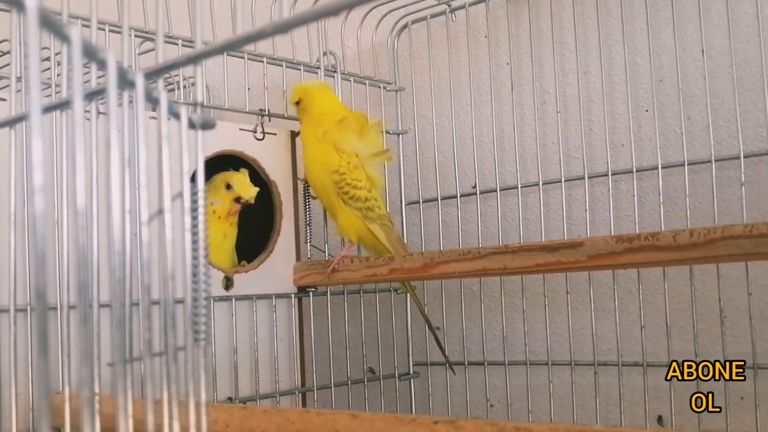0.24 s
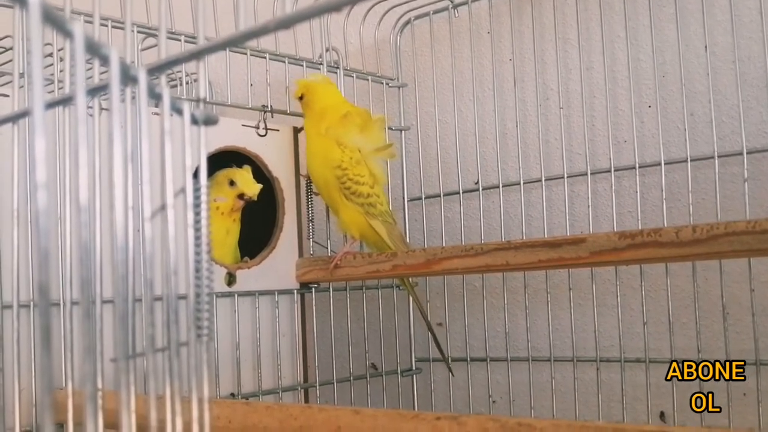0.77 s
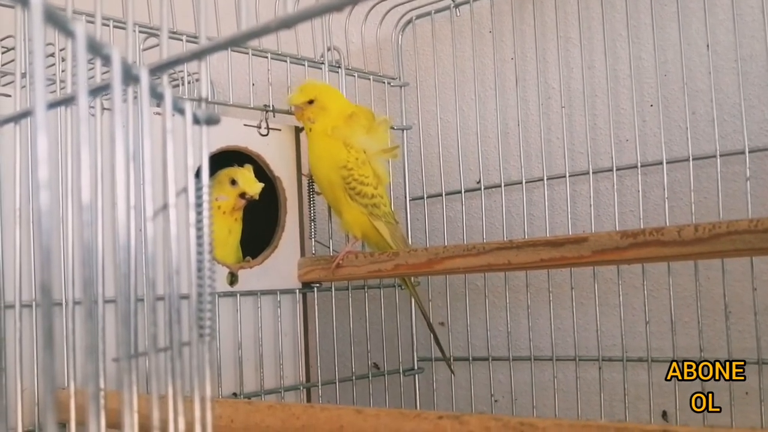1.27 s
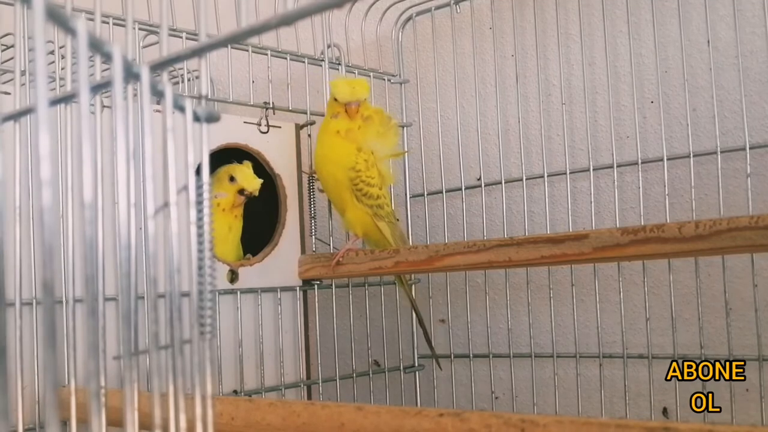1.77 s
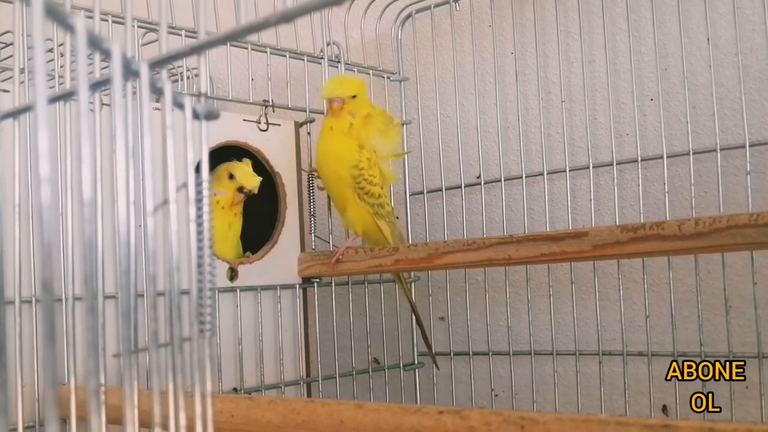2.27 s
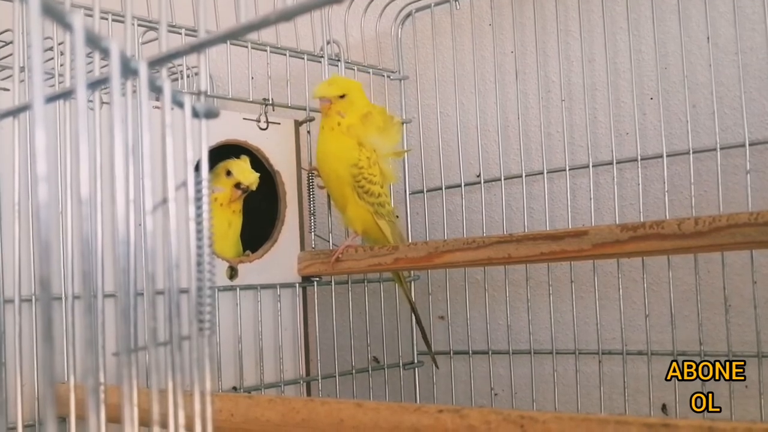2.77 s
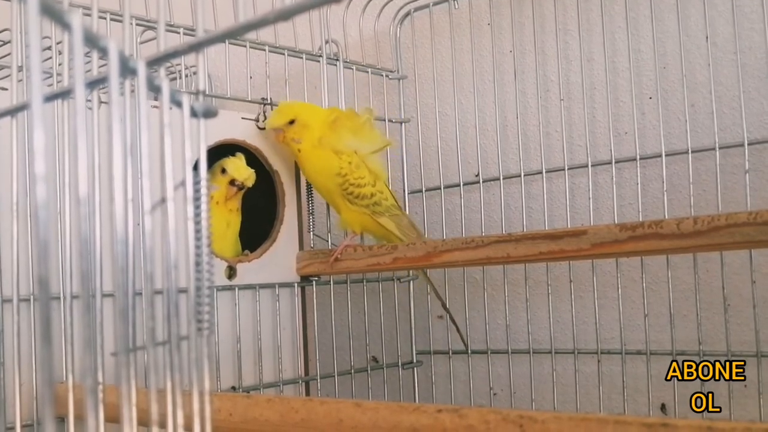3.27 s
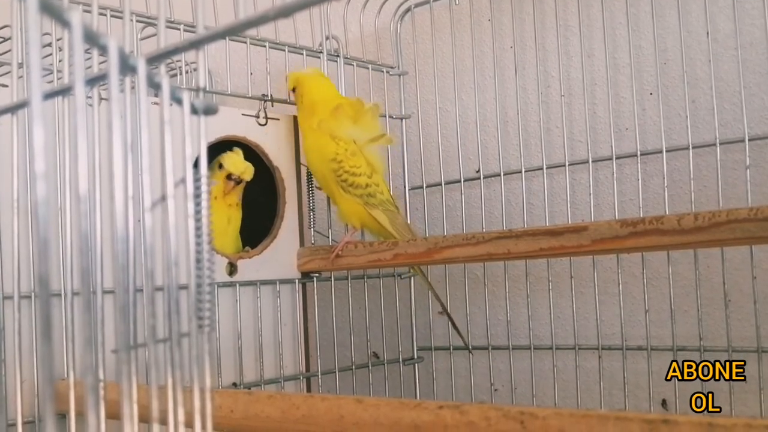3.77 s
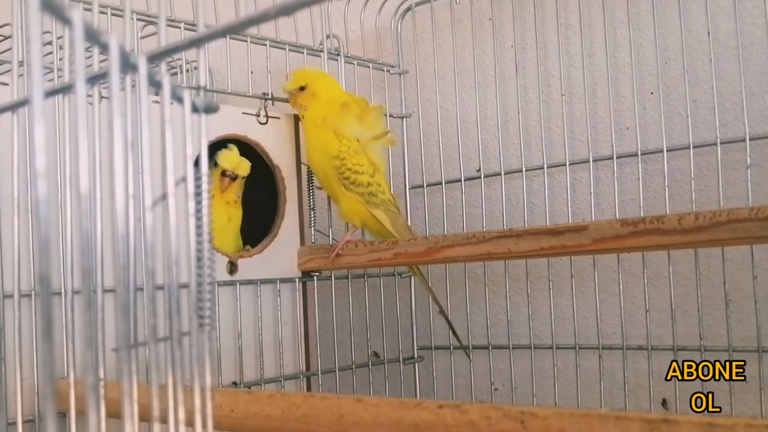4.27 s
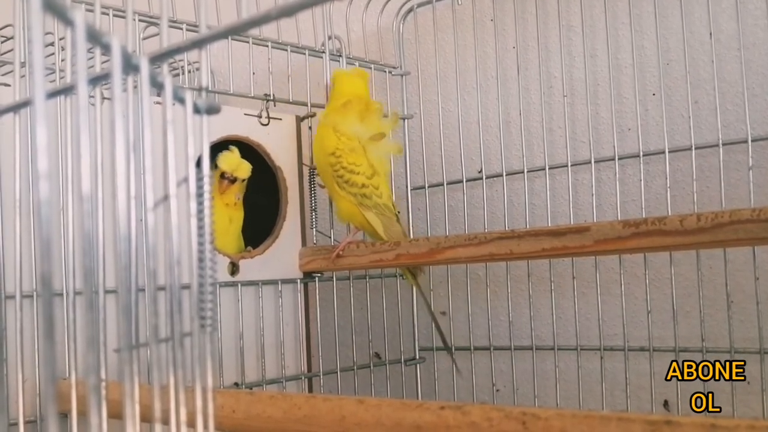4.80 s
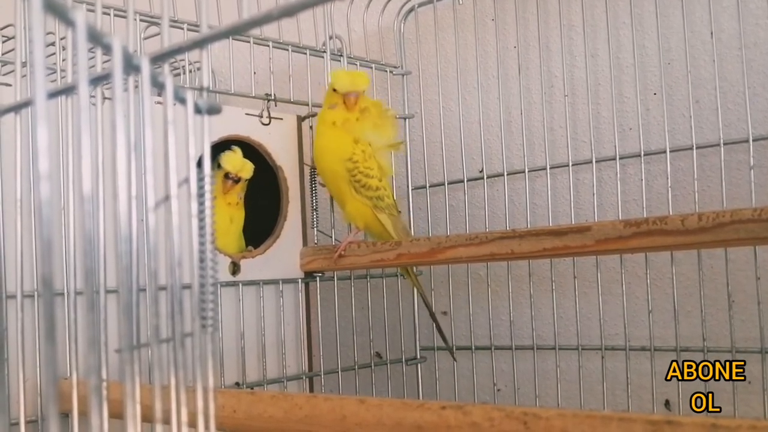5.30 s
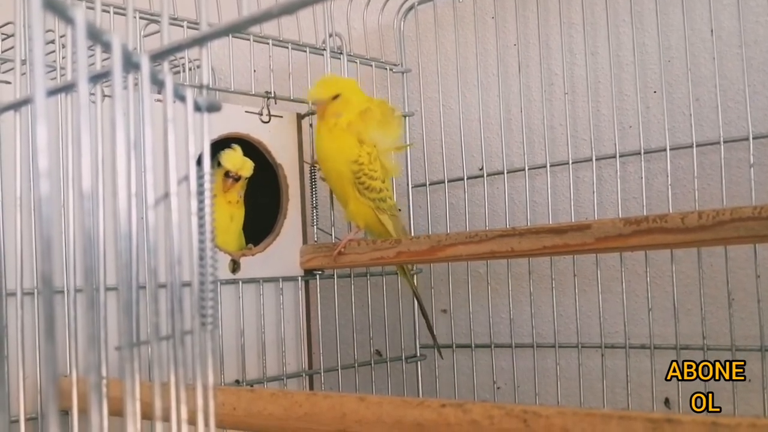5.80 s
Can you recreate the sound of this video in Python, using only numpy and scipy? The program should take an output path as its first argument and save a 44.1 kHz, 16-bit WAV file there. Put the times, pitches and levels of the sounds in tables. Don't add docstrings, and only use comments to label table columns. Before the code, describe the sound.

A dense volley of parakeet chirps opens at once, bright whistles and buzzy warbles around 3 kHz with higher rasps, ringing in a bare room. By 0.6 s it thins, leaving a low, rapid motor thump of about eighteen turns a second and a bassy air hush; soft doves begin cooing at about 0.4 s. Scattered chirps and rasps come at 1.2-1.5 s. From 1.8 to 3.5 s the chatter is thick, with purring syllables and harsh screeches near 5-6 kHz; doves coo again from 2.6 s. A calmer stretch lasts until about 4.25 s, then a crisp run of close, clear chirps bursts out until 5 s. Rasps and screeches continue to about 5.6 s, as a third cooing bout and faint feather flutter join. A few last burrs sound near 5.8-6 s. The background sinks under loud calls and creeps back.

```python
import sys
import numpy as np
from scipy import signal
from scipy.fft import rfft, irfft
from scipy.io import wavfile
from scipy.ndimage import uniform_filter1d

SR = 44100
rng = np.random.default_rng(int(sys.argv[2]) if len(sys.argv) > 2 else 0)


def transcribe(signal):
    frames = np.atleast_2d(signal).T
    limited = np.clip(frames, -1, 1)
    pcm = np.round(limited * 32767).astype(np.int16)
    wavfile.write(sys.argv[1], SR, pcm)


def makeup_ratio(level_db):
    decades = np.asarray(level_db, float) / 20
    return 10 ** decades


N = 266805
RISE, FALL = 1.13, .87


def on_log(hz, table):
    point_hz, values = np.array(table).T
    return np.interp(np.log(hz + 1), np.log(point_hz), values)


def walk(rate, size=N):
    k = max(int(SR / rate), 2)
    steps = np.repeat(rng.standard_normal(size // k + 2), k)
    wander = uniform_filter1d(uniform_filter1d(steps, k), k)[:size]
    return wander / np.std(wander)


def pair(size):
    # pitch_hz, likeness (0 to 1)
    likeness = [(60, 0.92), (290, 0.91), (630, 0.76), (1200, 0.02)]
    like = np.clip(on_log(np.fft.rfftfreq(size, 1 / SR), likeness), 0, 1)
    mid, side = rfft(rng.standard_normal((2, size)))
    shared = mid * np.sqrt(1 + like)
    differing = np.outer([1, -1], side * np.sqrt(1 - like))
    return (shared + differing) / np.sqrt(2)


def room(x, direct_db, build_s):
    # pitch_hz, time to fall by 60 dB (s)
    ring_times = [(400, 0.47), (1500, 1.65), (3500, 1.18), (6000, 1.08), (10000, 0.55)]
    size = 2 ** 16
    hz, t = np.fft.rfftfreq(size, 1 / SR), np.arange(size) / SR
    noise, tail = pair(size), 0
    early, early_fall = .38, np.log(1000) / .15
    for centre in 125 * 2. ** np.arange(8):
        octaves_off = np.log2((hz + 1) / centre)
        band = np.cos(np.pi / 2 * np.clip(octaves_off, -1, 1)) ** 2
        fall = np.log(1000) / on_log(centre, ring_times)
        late_power = (1 - early) * fall * np.exp(-2 * fall * t)
        early_power = early * early_fall * np.exp(-2 * early_fall * t)
        tail = tail + irfft(noise * band) * np.sqrt(2 * (late_power + early_power) / SR)
    tail = tail * (1 - np.exp(-t / build_s))
    tail[[0, 1], [0, 17]] += makeup_ratio(direct_db)
    return signal.fftconvolve(x[None], tail, axes=1)[:, :N]


def notes(table, depth_hz, buzz_hz, jitter, regular, throb, octave_db, edge):
    out = np.zeros(N + SR)
    speed_hz = buzz_hz * (1 + .15 * walk(6) + jitter * walk(60))
    cycle = 2 * np.pi * np.cumsum(speed_hz) / SR
    regular = np.clip(regular, 0, 1)
    swing = np.sqrt(2 * regular) * np.sin(cycle) + np.sqrt(1 - regular) * walk(3.1 * buzz_hz)
    chop = np.exp(throb * np.cos(cycle) + throb * (1 - regular) * walk(2.2 * buzz_hz))
    chop = chop * np.exp(0.3 * throb * walk(buzz_hz / 7))
    for start_s, length_s, first_hz, last_hz, level_db in table:
        start = int(start_s * SR)
        u = np.linspace(0, 1, int(max(length_s, 1 / 200) * SR))
        at = np.minimum(start + np.arange(len(u)), N - 1)
        hz = first_hz + (last_hz - first_hz) * u + depth_hz * swing[at]
        phase = 2 * np.pi * np.cumsum(hz) / SR
        tone = np.sin(phase) + makeup_ratio(octave_db) * np.sin(2 * phase)
        if first_hz < SR / 10:
            tone = tone + makeup_ratio(octave_db - 7.0) * np.sin(3 * phase)
        shape = np.sin(np.pi * u) ** edge * chop[at]
        loudness = makeup_ratio(level_db) / np.sqrt(np.mean(shape ** 2))
        out[start:start + len(u)] += loudness * shape * tone
    return out[:N]


def bent(rows, bend, length_s=None):
    return [(r[0], length_s or r[1], r[-2], r[-2] * bend, r[-1]) for r in rows]


def phrases(held, up, down):
    return bent(held, 1) + bent(up, RISE) + bent(down, FALL)


def whistles():
    # start_s, pitch_hz, level_db
    chirp_rows = [(0.0, 3452, -11), (.027, 3143, -14), (.062, 3503, -21), (.501, 3265, -23.5),
                  (1.424, 4870, -33.5), (1.883, 3714, -18.5), (1.903, 2884, -19.5), (2.283, 3460, -38),
                  (2.302, 2960, -35), (2.632, 5960, -20.5), (2.836, 3170, -21.5), (2.886, 3027, -20),
                  (3.855, 2886, -21.5), (4.402, 3392, -15), (4.427, 3115, -16), (4.487, 3430, -22.5),
                  (4.492, 3053, -22), (4.617, 3190, -16.5), (5.944, 5850, -30)]
    # start_s, first_hz, level_db
    flick_rows = [(.042, 3910, -24), (1.295, 3010, -31), (1.866, 2987, -20.5), (2.552, 6180, -29),
                  (3.225, 3870, -24.5), (3.25, 5550, -23), (3.43, 5420, -26), (4.378, 3900, -26),
                  (4.986, 2730, -23)]
    # start_s, length_s, pitch_hz, level_db
    held_rows = [(.077, 0.068, 5630, -34), (.232, 0.11, 1960, -36), (1.96, 0.029, 3320, -22),
                 (3.7, 0.22, 2907, -34), (2.457, 0.1, 5280, -34), (2.811, 0.099, 3690, -27.5),
                 (4.343, 0.035, 3480, -33), (4.358, 0.047, 2870, -23), (5.914, 0.012, 3770, -21)]
    # start_s, length_s, first_hz, level_db
    falling_rows = [
        (.252, 0.11, 4300, -32),
        (0.372, 0.092, 2830, -32),
        (.402, 0.0438, 4080, -23),
        (3.572, 0.17, 3215, -31),
    ]
    rows = bent(chirp_rows, 0.98, length_s=0.017) + bent(flick_rows, RISE, length_s=0.0226)
    rows = rows + phrases(held_rows, [], falling_rows)
    return notes(rows, depth_hz=43.8, buzz_hz=260., jitter=0.101, regular=0.22, throb=0.32,
                 octave_db=-30.0, edge=0.56)


def burrs():
    # start_s, length_s, pitch_hz, level_db
    held_rows = [(0.0, 0.0063, 5650, -25), (.07, 0.11, 5420, -26), (2.806, 0.032, 6940, -28.5),
                 (2.961, 0.11, 2283, -33), (3.031, 0.032, 7440, -38), (3.15, 0.017, 7550, -38),
                 (3.33, 0.032, 6300, -31.5), (4.368, 0.24, 9470, -51.5), (5.226, 0.14, 5910, -33),
                 (5.32, 0.028, 7200, -35), (5.485, 0.09, 5740, -37.5), (5.815, 0.031, 9160, -34),
                 (5.814, 0.032, 6210, -23)]
    # start_s, length_s, first_hz, level_db
    rising_rows = [(2.396, 0.016, 2910, -20), (2.741, 0.015, 3030, -24), (3.15, 0.028, 3340, -27),
                   (3.26, .14, 3560, -27.5), (3.37, .14, 2950, -35.5), (4.742, 0.13, 3115, -28),
                   (5.166, 0.17, 3024, -32.5)]
    # start_s, length_s, first_hz, level_db
    falling_rows = [(.022, 0.13, 2942, -28), (.427, 0.16, 4000, -28.5), (1.478, 0.25, 2913, -36),
                    (2.267, 0.085, 3600, -25), (2.412, 0.13, 2926, -26.5), (2.567, .13, 3350, -29),
                    (4.512, 0.1, 3407, -26), (4.926, 0.14, 3203, -31), (5.795, 0.082, 3080, -28.5),
                    (6.004, 0.044, 3235, -25)]
    return notes(phrases(held_rows, rising_rows, falling_rows), depth_hz=454.0, buzz_hz=330., jitter=.08,
                 regular=0.82, throb=1.0, octave_db=-23.0, edge=0.49)


def rasps():
    # start_s, length_s, pitch_hz, level_db
    rasp_rows = [(0.0, 0.0077, 3642, -15.5), (.002, 0.27, 6250, -42.5), (.022, 0.15, 8930, -41),
                 (.227, 0.43, 3664, -36.5), (.367, 0.32, 5100, -42.5), (.481, 0.084, 8350, -45.5),
                 (.531, 0.0475, 4020, -26), (1.205, 0.0663, 3485, -28.5), (1.344, 0.05, 6860, -42.5),
                 (1.412, 0.0383, 4200, -24.5), (1.833, 0.091, 7380, -50), (2.068, 0.1183, 3058, -26.5),
                 (2.252, 0.077, 5860, -37.5), (2.776, 0.1136, 3572, -28), (3.14, 0.0397, 5360, -24),
                 (3.24, 0.017, 2530, -30.5), (3.904, 0.065, 3416, -28), (4.27, 0.12, 14200, -62),
                 (4.5, .2, 13800, -63), (4.78, 0.12, 14000, -61), (4.333, 0.068, 5970, -54),
                 (4.467, 0.16, 4570, -40.5), (4.712, 0.037, 5815, -46), (4.86, 0.101, 2985, -29.5),
                 (5.051, 0.1426, 3822, -29), (5.31, 0.1027, 3548, -30), (5.46, 0.0727, 3550, -29),
                 (5.47, 0.036, 7030, -31.5), (5.899, 0.14, 4115, -33)]
    # start_s, length_s, pitch_hz, level_db
    screech_rows = [(2.091, 0.053, 5870, -29), (2.453, 0.14, 5550, -28.5), (2.606, 0.046, 5690, -26.5),
                    (2.692, .14, 5540, -27), (2.853, 0.13, 6390, -33), (2.991, 0.12, 5430, -30.5),
                    (3.19, 0.13, 5600, -28), (3.386, 0.067, 6060, -26.5), (5.104, 0.16, 5850, -28),
                    (5.315, 0.16, 5820, -27.5)]
    upper = [(start_s, length_s, hz * 1.6, db - 10.5) for start_s, length_s, hz, db in screech_rows]
    return notes(bent(rasp_rows + screech_rows + upper, 0.93), depth_hz=961.0, buzz_hz=430., jitter=.03,
                 regular=0.93, throb=1.0, octave_db=-19.0, edge=0.43)


def warbles():
    # start_s, length_s, pitch_hz, level_db
    held_rows = [(.012, 0.17, 3300, -23), (.152, 0.012, 3306, -15), (.576, 0.1, 1703, -34.5),
                 (1.122, 0.07, 2860, -38), (1.14, 0.059, 1897, -39.5), (1.188, 0.05, 2493, -31.5),
                 (1.629, 0.094, 1817, -33.5), (1.838, 0.014, 3690, -25.5), (2.302, .14, 3188, -17.5),
                 (2.637, 0.16, 1980, -36.5), (2.726, 0.039, 5410, -25), (2.741, 0.047, 4880, -28),
                 (2.946, 0.068, 3666, -28), (4.258, 0.078, 3423, -22.5), (4.358, 0.15, 3327, -26.5),
                 (5.156, 0.047, 6300, -26), (5.35, .11, 5790, -29)]
    # start_s, length_s, first_hz, level_db
    rising_rows = [
        (.446, 0.16, 2031, -34),
        (1.379, 0.022, 2656, -26),
        (1.903, 0.026, 5570, -34.5),
        (3.859, 0.075, 2048, -34),
        (4.383, 0.19, 2205, -35),
        (5.133, 0.046, 5360, -25.5),
    ]
    # start_s, length_s, first_hz, level_db
    falling_rows = [(1.823, 0.15, 3230, -25), (1.853, 0.14, 2243, -36), (1.863, .16, 3670, -25.5),
                    (2.487, 0.026, 6410, -24), (2.796, 0.15, 3344, -31), (2.851, .14, 3687, -21),
                    (3.549, 0.21, 3910, -40.5), (3.68, 0.083, 2550, -31), (4.258, 0.025, 3160, -25.5),
                    (4.682, 0.16, 2095, -37.5), (5.071, .04, 4430, -30)]
    return notes(phrases(held_rows, rising_rows, falling_rows), depth_hz=178.0, buzz_hz=250., jitter=.1,
                 regular=0.735, throb=0.53, octave_db=-30, edge=0.15)


def clear_calls():
    # start_s, length_s, pitch_hz, level_db
    syllable_rows = [(.068, .012, 3466, -20), (0.096, 0.015, 3380, -17.5), (.14, .012, 3480, -23),
                     (.158, 0.029, 3500, -22), (0.236, 0.015, 3170, -23.5), (1.973, .01, 3430, -19.5),
                     (1.985, 0.022, 3405, -21), (2.014, 0.018, 3390, -22), (2.051, 0.013, 3414, -24),
                     (4.7, .01, 3170, -27), (2.349, 0.011, 3310, -21), (2.369, 0.018, 3200, -17.5),
                     (4.424, .014, 3400, -18), (4.473, 0.016, 3370, -20)]
    # start_s, length_s, pitch_hz, level_db
    fleck_rows = [(1.19, 0.037, 7660, -53), (1.3, 0.048, 6730, -46), (1.61, .09, 8100, -57.5),
                  (1.64, 0.069, 6660, -52), (1.65, 0.091, 7700, -59), (1.65, .05, 7900, -59),
                  (1.68, 0.082, 9680, -57.5), (1.72, .06, 6430, -55), (1.85, 0.045, 9500, -51),
                  (1.885, 0.066, 7410, -49), (2.88, 0.063, 1414, -39), (4.245, 0.047, 8900, -57),
                  (4.32, 0.029, 9660, -55), (4.36, .05, 5865, -49), (4.43, .04, 9500, -52),
                  (4.47, 0.034, 7200, -55), (4.53, 0.066, 6000, -54), (4.55, .05, 9200, -60),
                  (4.31, 0.041, 2110, -41.5), (4.808, 0.018, 1680, -35.5), (4.826, 0.022, 1440, -36.5),
                  (5.02, 0.048, 1232, -43.5), (4.886, 0.011, 3350, -26)]
    # start_s, length_s, first_hz, level_db
    pip_rows = [(1.44, .07, 1175, -39), (1.82, .03, 3660, -36), (1.95, .022, 3380, -16),
                (2.281, .016, 3430, -19), (2.412, .022, 3420, -19), (2.56, .03, 6680, -31),
                (3.245, .03, 1500, -42), (3.585, .03, 2980, -33), (3.655, .03, 2910, -32),
                (4.01, .08, 5730, -50), (4.272, .024, 3600, -17), (4.28, .025, 7200, -47),
                (4.3, .014, 3600, -17), (4.32, .014, 3350, -15), (4.37, .02, 3420, -21),
                (4.404, .018, 3400, -16), (4.498, .014, 3480, -15), (4.533, .016, 3500, -16),
                (4.784, .014, 3550, -21), (4.822, .02, 4250, -29), (4.851, .023, 3580, -17),
                (4.893, .018, 3550, -18.5), (4.99, .05, 2800, -30), (5.59, .02, 1840, -40)]
    # start_s, pitch_hz, level_db
    purr_rows = [(2.889, 3050, -21.5), (2.905, 3650, -17), (2.932, 3390, -23), (2.941, 3500, -18),
                 (2.951, 3260, -21), (2.959, 3400, -20), (2.974, 3540, -20), (2.419, 3100, -17.5),
                 (2.427, 3300, -18.5), (4.437, 3230, -17.5), (4.501, 3110, -21)]
    rows = bent(pip_rows, 1.012) + bent(fleck_rows + syllable_rows, 1) + bent(purr_rows, 1, length_s=.006)
    calls = notes(rows, depth_hz=35., buzz_hz=200., jitter=.1, regular=.5, throb=.12, octave_db=-40, edge=.4)
    return makeup_ratio(-10) * room(calls, direct_db=11.5, build_s=.006)


def parakeets():
    # pitch_hz, width_hz, lift_db
    resonances = [
        (3227, 11, 4.5),
        (3524, 430, 2),
    ]
    voices = whistles() + burrs() + rasps() + warbles()
    air = uniform_filter1d(uniform_filter1d(rng.standard_normal(N), size=3), size=4)
    breath = uniform_filter1d(np.abs(voices), size=40) * air
    voices = voices + makeup_ratio(-10.0) * breath
    hz = np.fft.rfftfreq(N, 1 / SR)
    lift_db = sum(db / (1 + (2 * (hz - f) / w) ** 2) for f, w, db in resonances)
    throat = 1 / (1 + (1500 / (hz + 1)) ** 14)
    voices = irfft(rfft(voices) * makeup_ratio(lift_db) * throat, N)
    return room(voices, direct_db=-7.5, build_s=.005) + clear_calls()


def motor():
    # multiple of the shaft speed, level_db
    multiples = [(1, -37), (2, -13), (3, 1), (4, -10.5), (5, -6.5), (6, -26), (7, -41), (8, -13.5),
                 (9, -20.5), (10, -17), (11, -21.5), (12, -18.5), (13, -19.5), (14, -14), (15, -14.5),
                 (16, -12.5), (17, -27), (18, -40)]
    turn_hz = 18.56 * (1 + 0.00192 * walk(1.475))
    turn = 2 * np.pi * np.cumsum(turn_hz) / SR
    hum = 0
    for k, db in multiples:
        waver_db = 1.5 * walk(2.88)
        side_shift = np.array([[0], [0.019 * k]])
        hum = hum + makeup_ratio(db + waver_db) * np.cos(k * turn - .6 * k ** 2 + side_shift)
    return hum / np.std(hum)


def hush():
    # pitch_hz, level_db (per Hz)
    colour = [(15, -44), (25, -7.5), (71, 0.5), (196, -10.5), (292, -12.5), (393, -10.5), (541, -12),
              (707, -16), (1450, -14), (2690, -11.5), (3080, -31), (3510, -20), (14900, -46)]
    noise = irfft(pair(N) * makeup_ratio(on_log(np.fft.rfftfreq(N, 1 / SR), colour)), N)
    return noise / np.std(noise)


def duck(loud, knee_db, hold_s, strength):
    keep = np.exp(-1 / (hold_s * SR))
    power = signal.lfilter([1 - keep], [1, -keep], np.mean(loud ** 2, axis=0))
    return (1 + power / makeup_ratio(2 * knee_db)) ** -strength


def doves():
    bout_starts = [
        0.39,
        2.59,
        4.8,
    ]
    # s after its start, length_s, first_hz, last_hz, level_db
    opening = [
        (0.0, 0.066, 450, 458, -59),
        (.19, .13, 495, 525, -54),
        (.26, .22, 618, 610, -53),
        (.27, .3, 525, 530, -54.5),
    ]
    # start_s, length_s, pitch_hz, level_db
    coo_rows = [(.82, 0.12, 622, -51.5), (1.1, 0.25, 554, -50), (1.13, 0.58, 616, -50.5),
                (1.24, 0.31, 550, -50.5), (1.56, 0.15, 524, -51.5), (3.08, 0.23, 602, -49.5),
                (3.15, 0.89, 533.7, -55), (3.38, 0.42, 650, -52.5), (3.45, 0.38, 603.3, -52),
                (3.6, 0.26, 655, -55), (3.9, 0.19, 550, -70), (5.25, 0.41, 549.3, -52.5),
                (5.36, 0.33, 600, -49.5), (5.62, 0.23, 630, -50.5), (5.66, 0.13, 515, -48),
                (5.88, 0.16, 602, -51), (5.88, 0.21, 517, -51.5)]
    # start_s, length_s, first_hz, last_hz, level_db
    coo_ends = [(.57, 0.11, 490, 498, -52), (.95, 0.19, 519.5, 547, -47), (1.57, 0.17, 536, 533.3, -44.5),
                (2.73, .1, 488, 515, -60), (3.8, 0.3, 543.4, 550.5, -50.5), (3.86, 0.12, 464, 450, -60),
                (4.96, 0.11, 494, 505, -53)]
    # start_s, length_s, first_hz, last_hz, level_db
    shuffles = [
        (.42, .1, 150, 150, -58),
        (2.22, .18, 150, 148, -58),
        (5.66, .12, 280, 280, -55),
    ]
    # start_s, length_s, first_hz, last_hz, level_db
    rustle = [
        (5.15, .6, 900, 900, -51),
    ]
    coos = [(start_s + s, *rest) for start_s in bout_starts for s, *rest in opening]
    coos = coos + bent(coo_rows, 0.97)
    x = notes(coos, depth_hz=23.4, buzz_hz=30., jitter=0.2473, regular=0.42, throb=0.48,
              octave_db=-36.0, edge=0.07)
    x = x + notes(shuffles, depth_hz=34.0, buzz_hz=30., jitter=0.4, regular=0.14, throb=0.4,
                  octave_db=-27, edge=0.3)
    x = x + notes(rustle, depth_hz=347.0, buzz_hz=90., jitter=0.23, regular=0.041, throb=0.48,
                  octave_db=-2.6, edge=0.29)
    x = x + notes(coo_ends, depth_hz=2.6, buzz_hz=18.0, jitter=0.19, regular=0.43, throb=0.11,
                  octave_db=-50, edge=0.34)
    return room(x, direct_db=0.26, build_s=0.0023)


def scene():
    # time_s, level_db
    drift = [(0, -46), (1.2, -48), (2.4, -45), (3.6, -48), (4.8, -45), (5.55, -48.5), (5.75, -44.5),
             (6.05, -53)]
    birds = parakeets()
    drift_s, drift_db = np.transpose(drift)
    level = makeup_ratio(np.interp(np.arange(N) / SR, drift_s, drift_db))
    background = level * (makeup_ratio(-1.5) * motor() + makeup_ratio(-1.5) * hush())
    gain = duck(birds, knee_db=-32, hold_s=.1, strength=.42)
    return birds + background * gain + doves()


def roll_off(x):
    return signal.sosfilt(signal.butter(12, 15040, fs=SR, output="sos"), x)


def record(dry):
    hz = np.fft.rfftfreq(N, 1 / SR)
    mic_db = on_log(hz, [(9000, 2.0), (10500, -3.0), (11500, -4.5), (15000, -4.5)])
    pan_db = on_log(hz, [(60, 1.2), (150, -1.0), (700, -0.2), (1500, -5.5), (3500, -2.5), (8000, -2.0)])
    gain = makeup_ratio(mic_db + np.outer([1, -1], pan_db) / 2)
    mix = irfft(rfft(dry) * gain, N)
    return roll_off(mix)


dry = scene()
out = record(dry)
transcribe(out)
```